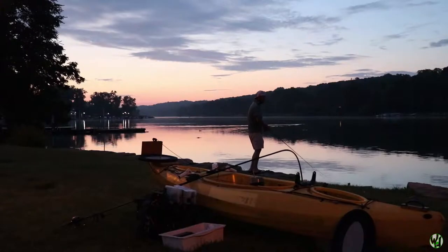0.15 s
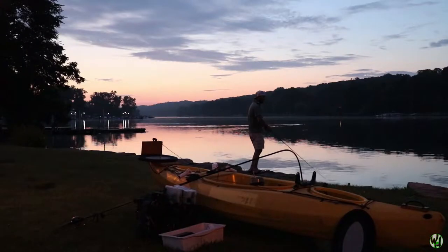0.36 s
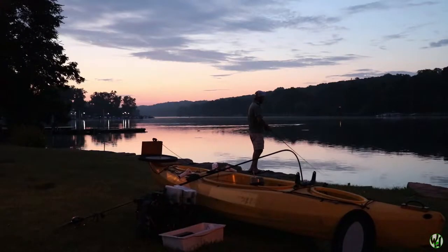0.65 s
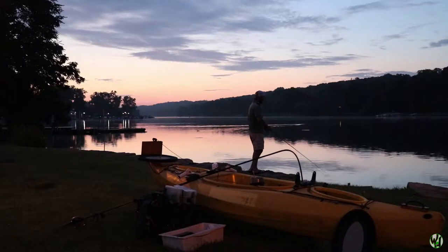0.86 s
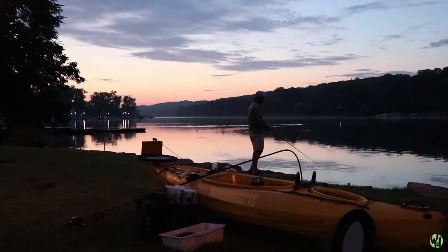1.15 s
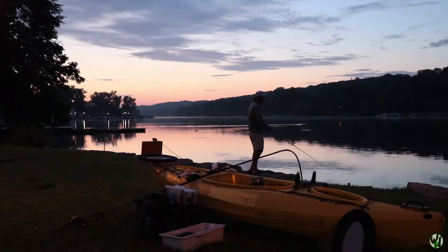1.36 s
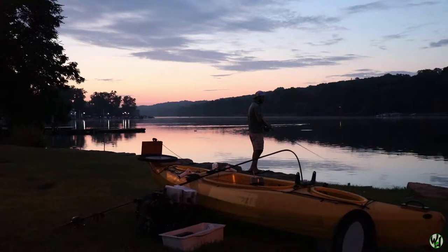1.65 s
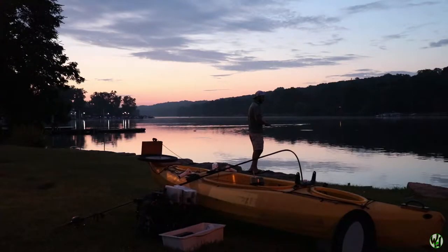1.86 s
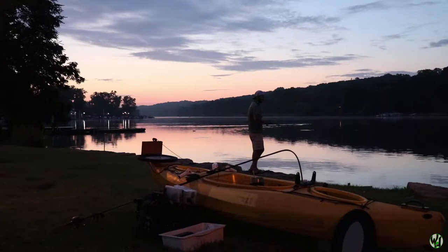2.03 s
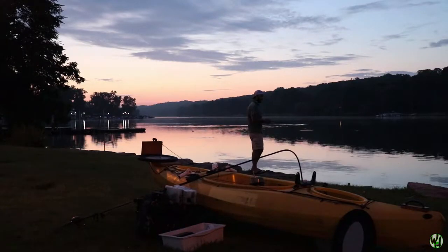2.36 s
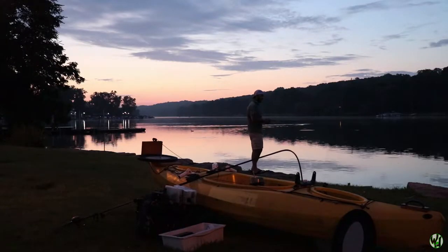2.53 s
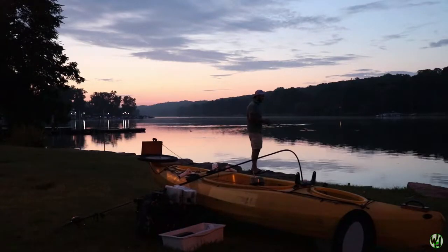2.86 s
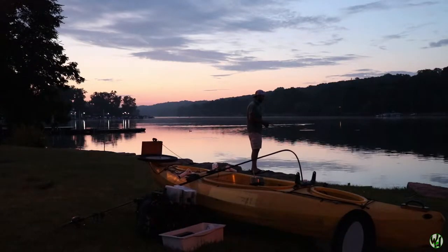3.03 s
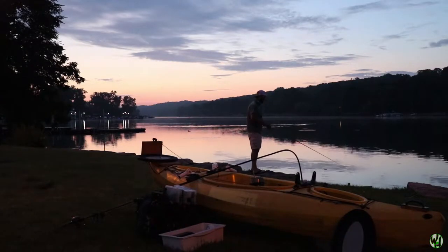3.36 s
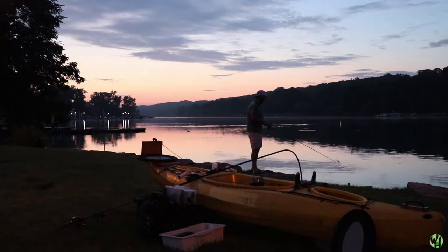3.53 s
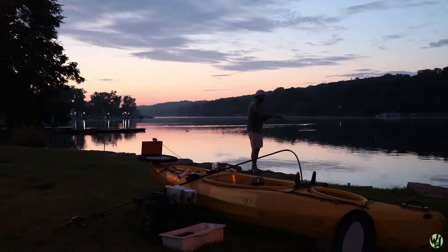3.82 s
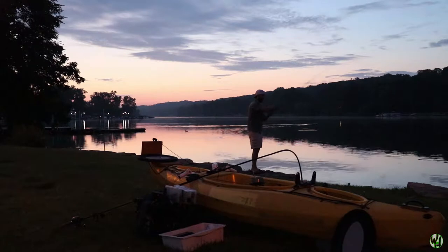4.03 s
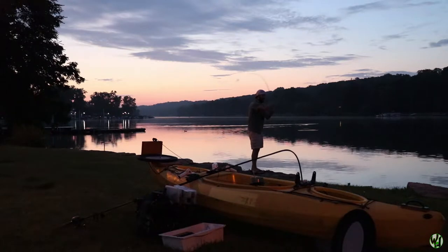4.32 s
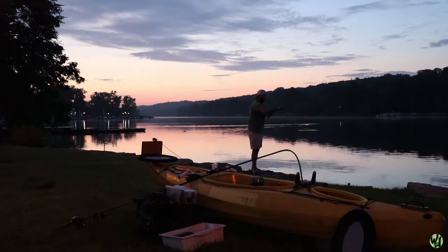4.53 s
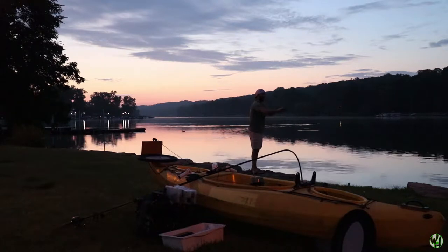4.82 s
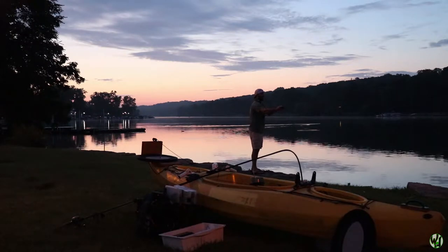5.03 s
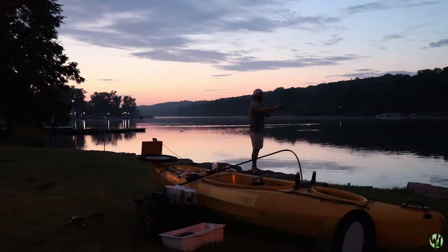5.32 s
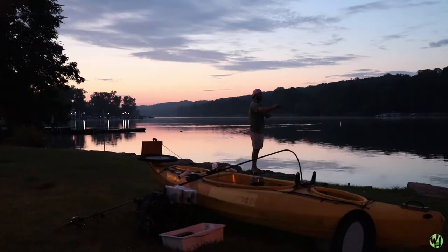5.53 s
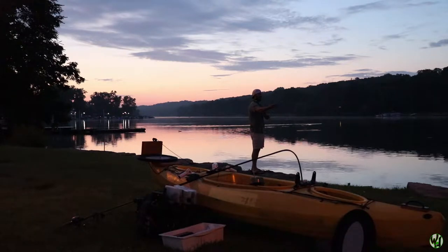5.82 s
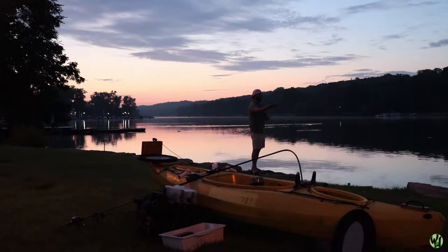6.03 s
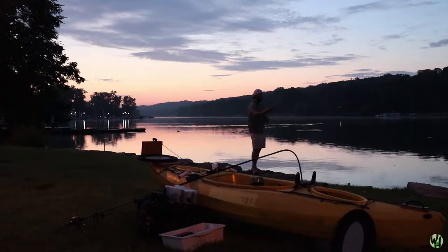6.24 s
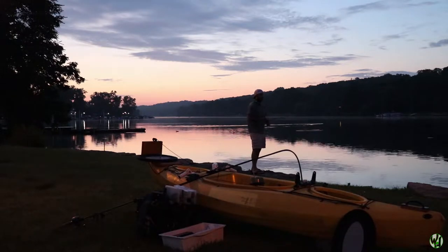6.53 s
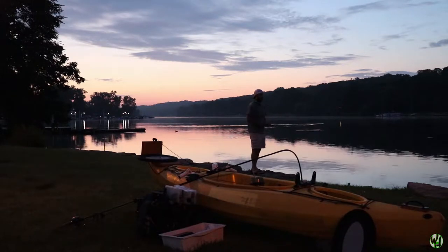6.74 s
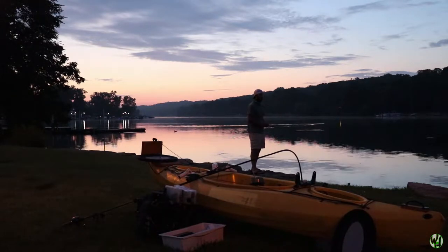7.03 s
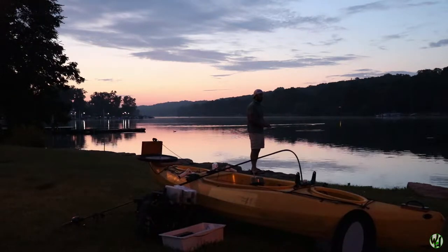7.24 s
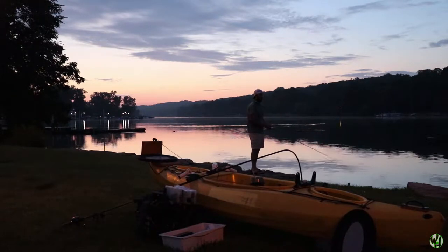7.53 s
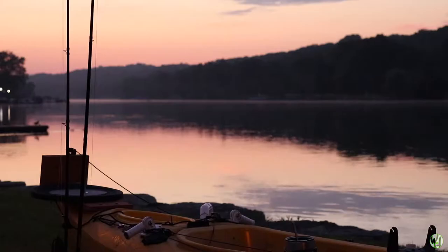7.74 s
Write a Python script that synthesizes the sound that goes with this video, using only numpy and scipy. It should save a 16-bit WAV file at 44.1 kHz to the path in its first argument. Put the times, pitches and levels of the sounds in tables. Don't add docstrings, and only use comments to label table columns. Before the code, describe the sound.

Lively birdsong echoes off lakeside trees while an angler's clothes rustle softly, the reel clicks, and a rod whips out a hissing line.

```python
import sys
import numpy as np
from scipy import signal
from scipy.io import wavfile
from scipy.ndimage import uniform_filter1d

SR = 44100
rng = np.random.default_rng(int(sys.argv[2]) if len(sys.argv) > 2 else 0)


def makeup_ratio(level_db):
    decades = np.asarray(level_db, float) / 20
    return 10 ** decades


def materialize(psi):
    bounded = np.clip(np.atleast_2d(psi).T, -1, 1)
    quanta = np.round(bounded * 32767).astype(np.int16)
    wavfile.write(sys.argv[1], SR, quanta)


N = 347508
TREES_T60_S = 0.52


def evened(x):
    return x / np.sqrt(np.mean(x ** 2) + 1e-20)


def read(points, hz):
    f, value = np.transpose(points)
    return np.interp(np.log(hz + 1), np.log(f + 1), value)


def curve(rows, column, off=None):
    rows = np.array(rows)
    return np.interp(np.arange(N) / SR, rows[:, 0], rows[:, column], off, off)


def add(mix, s, sound):
    part = mix[..., round(s * SR):][..., :sound.shape[-1]]
    part += sound[..., :part.shape[-1]]


def resonate(x, hz, width):
    turn = np.exp(2j * np.pi * np.cumsum(hz * np.ones(len(x))) / SR)
    r = np.exp(-np.pi * width / SR)
    smooth = signal.lfilter([(1 - r) ** 2], [1, -2 * r, r * r], x / turn + 1e-18)
    return 2 * (turn * smooth).real


def noise(colour, patchy_db, size=1024):
    frames, hz = 4 * N // size + 5, np.fft.rfftfreq(size, 1 / SR)
    a, b, patches = rng.standard_normal((frames, len(hz), 3)).T
    patches = uniform_filter1d(patches, size=12, axis=0)
    patches = evened(uniform_filter1d(patches, size=10, axis=1))
    z = (a + 1j * b) * makeup_ratio(read(colour, hz)[:, None] + patchy_db * patches)
    return evened(signal.istft(z, nperseg=size, noverlap=3 * size // 4)[1][:N])


def syrinx(hz, level_db, overtone_db, waver):
    steps = np.arange(len(hz)) * 250 / SR
    bend, throb = (np.interp(steps, np.arange(120), knots) for knots in rng.standard_normal((2, 120)))
    turn = 2 * np.pi * np.cumsum(hz * (1 + .015 * waver * bend)) / SR
    third = 0.23 * np.sin(3 * turn) * (3 * hz < SR / 2)
    tone = np.sin(turn) + makeup_ratio(overtone_db) * (np.sin(2 * turn) + third)
    return makeup_ratio(level_db + 2.5 * waver * throb) * tone * signal.windows.tukey(len(hz), .25)


def call(shape, overtone_db=-50, waver=1.1):
    s, hz, db = np.transpose(shape)
    t = np.arange(s[0], s[-1], 1 / SR)
    glide = uniform_filter1d(np.interp(t, s, hz), size=150)
    tone = syrinx(glide, np.interp(t, s, db), overtone_db, waver)
    return np.r_[np.zeros(round(s[0] * SR)), tone]


def slide(length, first_hz, middle_hz, last_hz, db, waver=.4):
    u = np.arange(0, 1, 1 / (length * SR))
    glide = first_hz * (1 - u) * (1 - 2 * u) + 4 * middle_hz * u * (1 - u) + last_hz * u * (2 * u - 1)
    return syrinx(glide, db - 2.5 * (2 * u - 1) ** 2, -57, waver)


def scatter(sound, branch_db, count=16):
    delay, sign = rng.random((count, 2)).T
    spread_s = .09 * min(makeup_ratio(branch_db), 1)
    taps = np.zeros(SR // 10)
    places = (spread_s * SR * delay ** 1.5).astype(int)
    taps[places] = np.sign(sign - .5) * makeup_ratio(branch_db - 8 * delay)
    taps[0] = 1
    return signal.fftconvolve(sound, taps / np.linalg.norm(taps))


def trees(x, t60):
    t, out = np.arange(0, 30000, 20), np.zeros(len(x))
    fade = makeup_ratio(-60 * t / SR / t60) * np.clip(t / SR / 0.021, 0, 1)
    for k in range(3):
        tail = np.zeros(t[-1] + 20)
        tail[t + rng.integers(0, 20, len(t))] = rng.laplace(size=len(t)) * fade
        share = np.sqrt(2 / 3) * np.cos(np.pi * (np.arange(len(x)) / SR * 0.889 + k / 3))
        out += signal.oaconvolve(x * share, tail / np.linalg.norm(tail))[:len(x)]
    return out


def sing(notes, calls, overtone_db, branch_db, echo_db):
    birds = np.zeros((2, N))
    for s, db in calls:
        for note in notes:
            voice = scatter(call(note, overtone_db), branch_db)
            add(birds, s, np.outer(makeup_ratio(db + np.array([0, echo_db])), voice))
    return birds


def gust():
    # pitch_hz, level_db
    gust_colour = [(12, -45), (20, -11), (86, -4.5), (172, -16), (217, -36), (416, -31), (586, -42),
                   (812, -36), (1500, -46.5), (1950, -45), (3300, -120)]
    hold_s, fall_db_per_s = 0.032, 64
    fall_db = fall_db_per_s * np.maximum(np.arange(N) / SR - hold_s, 0)
    return makeup_ratio(-23 - fall_db) * noise(gust_colour, patchy_db=0.5, size=2048)


def still_air():
    # pitch_hz, level_db
    air_colour = [(20, -45), (38, -14.5), (76, 2), (113, 1), (184, -3), (425, -18), (880, -21),
                  (1500, -26.5), (2300, -17), (3400, -9), (4400, -15.5), (5800, -29.5), (8000, -43),
                  (15800, -43)]
    return makeup_ratio(-41.5) * noise(air_colour, patchy_db=1.0, size=2048)


def far_road():
    # time_s, level_db
    road_level = [(0.0, -54.5), (1.42, -53.5), (2.04, -46.5), (2.85, -55), (5.1, -52), (5.5, -77),
                  (7.88, -71)]
    colour = [(500, -31.0), (900, -7.0), (1400, -5.5), (2100, 0.0), (3200, -26.5)]  # (Hz, dB)
    return makeup_ratio(curve(road_level, 1) - 3.5) * noise(colour, patchy_db=5.5)


def machinery():
    # pitch_hz, width_hz, level_db
    hums = [
        (360.3, 11, -69),
        (1033.3, 28, -66),
        (487, 47, -67.5),
        (2400, 44, -63),
    ]
    return sum(makeup_ratio(db) * evened(resonate(rng.standard_normal(N), hz, width)) for hz, width, db in hums)


def far_birds():
    # time_s, level_db
    chorus_level = [(0.0, -44.5), (.33, -41), (.68, -48.5), (.85, -38.5), (1.21, -48), (1.82, -46.5),
                    (2.6, -45), (2.98, -58), (3.1, -45), (3.27, -44), (4.25, -40), (4.56, -52.5),
                    (4.98, -40.5), (6.06, -68), (6.39, -43), (7.15, -52.5), (7.55, -44.5), (7.88, -57)]
    chirps_per_s = 42
    crowd = np.zeros(N + SR)
    draws = rng.random((int(chirps_per_s * len(crowd) / SR), 7))
    for when, length, low, high, arch, fall, db in draws:
        hz = 3000 + 650 * (low + high)
        first_hz, last_hz = hz + 500 * arch - 450, hz - 250 - 550 * fall
        chirp = slide(.018 + .035 * length, hz, first_hz, last_hz, -15 * db, waver=1.2)
        add(crowd, when * len(crowd) / SR, scatter(chirp, -4))
    return makeup_ratio(curve(chorus_level, 1)) * evened((1.4 * crowd + trees(crowd, .45))[SR:])


def flock_chirps():
    # start_s, length_s, first_hz, last_hz,
    # level_db
    hidden = [(0, 0.034, 3500, 2740, -38), (0.042, .04, 3280, 2600, -39.5),
              (0.098, 0.047, 3310, 2610, -40.5), (0.148, 0.046, 3000, 2714, -42.5),
              (3.375, 0.024, 3296, 3570, -30.5), (3.396, 0.044, 3574, 2900, -32),
              (5.072, .03, 3900, 3006, -32.5), (5.095, 0.036, 3600, 2880, -44),
              (5.741, 0.045, 3300, 3620, -34), (6.342, 0.024, 3904, 3280, -25.5),
              (6.386, .025, 4220, 3520, -35), (6.275, 0.042, 4990, 5040, -43.5),
              (7.581, 0.012, 3680, 3320, -33.5), (2.88, 0.04, 5650, 5770, -56),
              (0.19, 0.035, 4580, 4640, -51), (0.763, 0.028, 5250, 5150, -50), (1, 0.031, 3600, 2650, -41),
              (1.317, 0.04, 4000, 3600, -38.5), (1.673, 0.073, 3900, 2990, -39.5),
              (3.731, 0.035, 3396, 3034, -34.5), (3.8, 0.027, 3140, 3120, -45),
              (4.464, 0.044, 2894, 3970, -37), (6.236, 0.077, 3910, 2730, -41.5),
              (6.53, 0.046, 3900, 2940, -40), (6.7, 0.034, 3900, 5100, -49), (6.503, .05, 3710, 4060, -49),
              (6.726, 0.037, 3300, 3050, -40)]
    # start_s, length_s, first_hz,
    # last_hz, level_db
    faint = [(1.282, 0.074, 2930, 2920, -40), (1.354, 0.026, 4750, 4700, -50),
             (1.577, 0.025, 4800, 4760, -42), (1.75, 0.023, 3010, 3750, -34),
             (2.162, 0.078, 3460, 3224, -42.5), (2.23, 0.028, 3400, 4230, -43),
             (2.335, .05, 4570, 4400, -47), (2.804, 0.018, 5300, 5330, -56),
             (3.038, .035, 3300, 4740, -40.5), (3.064, 0.029, 2870, 3700, -36.5),
             (3.078, 0.032, 3490, 2920, -44), (3.11, 0.044, 3300, 2990, -43),
             (3.097, 0.039, 5100, 5010, -48), (3.167, 0.035, 3676, 4200, -42.5),
             (3.183, .04, 3030, 3190, -48), (3.21, 0.018, 5760, 5600, -56), (3.683, 0.034, 4200, 5100, -42),
             (3.776, 0.05, 2970, 3830, -47), (3.933, .03, 2920, 3740, -44),
             (3.954, 0.051, 2960, 2960, -40.5), (4.645, 0.0353, 3500, 2780, -42),
             (4.78, 0.025, 4000, 3950, -40), (5.465, 0.086, 4280, 4240, -52),
             (5.484, 0.055, 4620, 4600, -55), (6.02, 0.022, 3250, 3210, -43),
             (6.057, 0.037, 3100, 3110, -37), (6.185, 0.03, 3250, 3010, -38),
             (6.991, 0.015, 5640, 6830, -47.5), (7.001, 0.01, 6700, 6100, -48),
             (7.507, .035, 2870, 3690, -57), (7.636, 0.018, 2975, 3240, -35.5),
             (7.668, 0.024, 3196, 2890, -40), (7.752, 0.048, 5350, 4020, -55)]
    # start_s, length_s, top_hz, level_db
    hoops = [(2.236, 0.025, 3860, -46), (3.003, 0.031, 4900, -41.5), (3.16, 0.059, 3870, -39.5),
             (5.781, 0.045, 3980, -42)]
    ends = 0.4
    chirps = [(s, length, a, (a + b) / 2, b, db) for s, length, a, b, db in hidden + faint]
    chirps += [(s, length, ends * hz, hz, ends * hz, db) for s, length, hz, db in hoops]
    birds = np.zeros((2, N))
    for s, *tone in chirps:
        add(birds, s, np.outer(makeup_ratio(np.array([3, -2.5])), scatter(slide(*tone, waver=1.14), -6)))
    return birds


def rustle():
    # middle_s, half_length_s, level_db
    rustles = [(.0, 0.14, -55), (0.208, 0.064, -54.5), (0.772, 0.048, -51.5), (1.37, 0.042, -52),
               (1.5, 0.066, -55), (1.842, 0.055, -50), (1.963, .037, -58), (2.202, 0.1, -50),
               (2.36, 0.046, -48), (2.458, 0.064, -60), (3.106, 0.067, -55), (3.34, 0.092, -53.5),
               (3.717, 0.036, -51), (4.63, 0.06, -45), (4.817, 0.17, -52.5), (5.052, 0.055, -49.5),
               (5.691, 0.097, -55.5), (6.323, 0.09, -50), (6.9, 0.04, -55), (7.35, 0.055, -51),
               (7.557, .04, -57)]
    # pitch_hz, level_db
    rustle_colour = [(900, -21), (5000, 7), (6500, 0.5), (7300, -1.5), (8300, -11), (9800, -4.5),
                     (11000, -12.5), (12300, -9), (13300, -13), (15500, -22)]
    t = np.arange(N) / SR
    swell = sum(makeup_ratio(db) * np.exp(-((t - s) / half) ** 2) for s, half, db in rustles)
    return swell * noise(rustle_colour, patchy_db=3.5, size=256)


def chip_bird():
    # time_s, pitch_hz, level_db
    chip = [(.01, 5200, 10.5), (.018, 6830, -0.5), (.024, 7010, 5), (.03, 6850, 0.5), (.036, 6070, -1.5),
            (.04, 5500, 6)]
    # start_s, level_db
    chips = [(.048, -44), (0.782, -44.5), (1.505, -45), (2.494, -46), (3.443, -45), (4.783, -47),
             (5.54, -46.5), (6.193, -46), (6.854, -45.5), (7.817, -45)]
    # delay_s, level_db
    echoes = [
        (0.038, -1.5),
        (0.091, -9),
        (.115, -18),
        (0.136, -29),
        (0.208, -26),
    ]
    direct, send = birds = np.zeros((2, N))
    for s, db in chips:
        add(birds, s, np.outer(makeup_ratio(db + np.array([0, 2.5])), call(chip, waver=0.41)))
        for (delay_s, bank_db), luck in zip(echoes, rng.standard_normal(len(echoes))):
            echo = scatter(call(chip, waver=0.67), -3.0)
            add(direct, s + delay_s, makeup_ratio(db + bank_db + 3.9 * luck) * echo)
    return birds


def far_arch_bird():
    # time_s, pitch_hz, level_db
    high = [(.012, 4403, 7), (.022, 5200, -2), (.04, 4900, 3.5), (.05, 3600, 10), (.062, 3180, -3)]
    # time_s, pitch_hz, level_db
    low = [(.062, 3100, 4), (.08, 3420, 4), (.1, 3900, 3), (.11, 3800, 2), (.128, 2950, 3.1)]
    # start_s, level_db
    calls = [(.179, -40), (.745, -38), (1.325, -43), (2.14, -47.5), (3.07, -41), (3.869, -42),
             (5.014, -38.5), (5.98, -42), (6.859, -39), (7.512, -38.5)]
    return sing((high, low), calls, -48, -2, -11)


def reel_and_drips():
    # start_s, peak_db, ring_hz, brightness_db
    clicks = [(0.199, -33.5, 925, -32), (0.77, -48, 950, -40), (1.38, -41.5, 907, -26),
              (1.499, -36.5, 1012, -33), (1.8, -37, 1320, -33), (3.7003, -17, 3770, -11),
              (3.7024, -32, 2000, -15), (3.7045, -27, 4500, -21), (3.866, -40, 7010, -7),
              (6.21, -44, 1540, 10.5), (6.689, -48, 8800, -8), (6.741, -58, 8000, -8),
              (2.766, -56, 8000, -8), (2.955, -58, 8500, -4), (7.3118, -36, 8300, -8),
              (7.3155, -17, 3300, -10), (7.318, -17.5, 2460, -19), (7.3188, -13.5, 2850, -14.5),
              (7.3194, -32, 783, -30), (7.3218, -22, 3000, -8), (7.324, -27, 1160, -20),
              (7.3297, -15.5, 3260, -15)]
    out, t = np.zeros(N), np.arange(700) / SR
    for (s, db, hz, bright_db), snap in zip(clicks, rng.standard_normal((len(clicks), 700))):
        ring_s = 0.00036 + 3600 / hz ** 2
        ring = np.sin(2 * np.pi * hz * t) * np.exp(-t / ring_s) * (1 - np.exp(-t / 0.000067))
        add(out, s, makeup_ratio(db) * (ring + makeup_ratio(bright_db) * snap * np.exp(-t / 0.00089)))
    return signal.sosfilt(signal.butter(3, 514, "high", fs=SR, output="sos"), out)


def whistles():
    # start_s, length_s, middle_hz, level_db
    drops = [(0.211, 0.026, 1930, -55), (.518, 0.036, 1740, -57), (0.85, 0.042, 1830, -61),
             (3.481, 0.17, 1730, -65), (3.879, .036, 1820, -49), (4.037, 0.033, 1847, -49),
             (4.188, 0.042, 1830, -48.5), (4.898, 0.063, 1897, -52), (6.531, 0.051, 1800, -72),
             (6.822, 0.085, 1740, -62), (7.136, 0.059, 1710, -61), (7.433, 0.033, 1840, -57),
             (7.72, 0.083, 1790, -60)]
    # start_s, length_s, first_hz, last_hz, level_db
    slurs = [
        (0.522, 0.36, 2800, 1900, -53),
        (2.052, 0.22, 1754, 2080, -54.5),
        (2.249, 0.35, 2170, 3090, -45),
        (2.739, 0.12, 2400, 1560, -58),
        (3.133, 0.19, 1670, 2035, -48.5),
        (3.409, 0.26, 2227, 3050, -41),
        (5.252, 0.17, 2830, 1350, -63),
        (5.485, .105, 2560, 2490, -57.5),
    ]
    # start_s, length_s, pitch_hz, level_db
    held = [(0.202, 0.1, 2433, -38.5), (0.315, 0.1, 2620, -42), (.736, 0.15, 2186, -54),
            (2.64, 0.062, 2045, -53.5), (2.96, 0.11, 2760, -50.5), (3.22, 0.098, 1690, -52),
            (3.28, 0.11, 2170, -53), (4.25, 0.08, 2390, -53), (5.829, 0.13, 2400, -58.5),
            (6.51, 0.16, 2438, -57), (6.723, 0.028, 2440, -55), (6.876, 0.084, 2320, -56)]
    sag = 1.6
    tones = [(s, length, 1.2 * hz, hz, .905 * hz, db) for s, length, hz, db in drops]
    for s, length, a, b, db in slurs:
        mean_hz = (a * b) ** .5
        tones.append((s, length, a, mean_hz - sag * ((a + b) / 2 - mean_hz), b, db))
    tones += [(s, length, hz, hz, hz, db) for s, length, hz, db in held]
    birds = np.zeros((2, N))
    for s, *tone in tones:
        add(birds, s, np.outer(makeup_ratio(np.array([4.5, -2.5])), slide(*tone)))
    return birds


def short_bird():
    # time_s, pitch_hz, level_db
    fall = [(.008, 3460, -18), (.022, 4750, -15.5), (.03, 4423, -17), (.036, 4234, -2.5), (.043, 4150, -6),
            (.049, 3490, -10), (.058, 3270, -3.5)]
    # time_s, pitch_hz, level_db
    peak = [(.082, 2758, -12.5), (.096, 3210, -15.5), (.104, 3543, 1.5), (.109, 3780, -17),
            (.112, 4005, -3.5), (.116, 3470, -4), (.124, 2841, -15)]
    # time_s, pitch_hz, level_db
    hurried = [(.012, 3900, 7), (.022, 4970, -11), (.032, 4900, -8.5), (.041, 4250, -6), (.05, 3950, 1),
               (.058, 3580, -12)]
    # start_s, level_db
    calls = [(.349, -18.5), (2.621, -18.5), (4.865, -18.5), (7.19, -21)]
    # start_s, level_db
    hurried_fall = [(3.358, -25)]
    # start_s, level_db
    hurried_peak = [(3.341, -20.5)]
    full = sing((fall, peak), calls, -48, -11, -14)
    quick = sing((hurried,), hurried_fall, -48, -11, -14)
    return full + quick + sing((peak,), hurried_peak, -48, -18, -14)


def across():
    # start_s, length_s, first_hz, last_hz, level_db
    calls = [(0.457, 0.2, 2470, 2330, -53), (1.07, 0.054, 2000, 1805, -54), (1.275, 0.047, 1900, 1800, -50),
             (1.962, 0.069, 2750, 2180, -47), (2.408, 0.065, 1950, 1730, -51.5),
             (3.8, 0.11, 2100, 1790, -53), (4.695, 0.041, 2000, 1870, -56), (4.772, 0.055, 2350, 2130, -47),
             (7.548, 0.055, 2800, 2210, -63), (7.62, .04, 2300, 2200, -53), (1.498, 0.061, 2500, 2440, -48),
             (4.0, 0.055, 2100, 1910, -54)]
    out = np.zeros(N)
    for s, length, first_hz, last_hz, db in calls:
        tone = slide(length, first_hz, (first_hz * last_hz) ** .5, last_hz, db)
        add(out, s, scatter(tone, -6.5))
    return out


def buzz_bird():
    # time_s, pitch_hz, level_db
    buzz = [(0, 6400, -8), (.012, 5900, 0), (.028, 6150, -2), (.04, 6900, -8)]
    # start_s, level_db
    calls = [(.595, -52), (1.44, -58), (2.14, -58), (3.075, -52), (3.262, -49), (4.285, -57), (5.238, -47),
             (6.835, -53), (7.475, -51)]
    return sing((buzz,), calls, -50, -3, -7)


def warbler():
    # time_s, pitch_hz, level_db
    held = [(.012, 3397, -6), (.024, 3953, -11), (.03, 4193, -3), (.058, 4223, -4.5), (.069, 3400, -0.5),
            (.082, 2950, -3.5)]
    # time_s, pitch_hz, level_db
    arch = [(.084, 3154, -5), (.108, 3700, -3), (0.124, 4133, -2.5), (.132, 3960, -5), (.14, 3300, -5),
            (0.151, 2510, 8)]
    # time_s, pitch_hz, level_db
    under = [(.094, 3173, 2), (.11, 3580, -4), (0.124, 3716, -8.5), (.134, 3620, -22), (.144, 2920, 1)]
    # time_s, pitch_hz, level_db
    upper = [(.02, 4220, 2), (0.031, 4810, -10), (.058, 4737, -7.5), (.072, 3440, -34)]
    # start_s, level_db
    calls = [(0.629, -28.5), (1.463, -28.5), (2.387, -26.5), (4.301, -30.5), (5.254, -28), (6.288, -28.5),
             (7.336, -28)]
    # start_s, level_db
    varied = [(3.281, -28)]
    full = sing((held, arch, under), calls, -26, -8, -9)
    full += sing((upper,), calls, -28, -10, -8)
    return full + sing((held, upper), varied, -26, -10, -9)


def tick_bird():
    # time_s, pitch_hz, level_db
    tick = [(.01, 5310, 35), (.016, 5810, 26.4), (.024, 5600, 19), (.03, 5030, 4.3)]
    # start_s, level_db
    calls = [(0.994, -66.5), (1.807, -65.5), (2.333, -65.5), (2.467, -69), (3.126, -70), (3.994, -69),
             (4.08, -73), (4.99, -63.5), (6.091, -68)]
    return sing((tick,), calls, -50, -9, -4)


def arch_bird():
    # time_s, pitch_hz, level_db
    high = [(.01, 3543, -20), (.018, 4137, 1.5), (.026, 5077, -6), (.049, 4900, -1.5), (.055, 4150, 4),
            (.067, 3494, 4.5), (.077, 3160, 5)]
    # time_s, pitch_hz, level_db
    low = [(.078, 3328, 7), (.087, 3965, -2), (.095, 4156, 8.5), (.106, 4170, -1.5), (.113, 3400, 6),
           (.122, 2800, -2.5), (.132, 2430, -4.5)]
    # start_s, level_db
    calls = [(1.076, -28.5), (1.846, -28.5), (4.088, -28), (5.608, -27.5), (6.337, -30)]
    return sing((high, low), calls, -42, -10, -11)


def slip_bird():
    # time_s, pitch_hz, level_db
    slip = [(0, 6430, -23), (.008, 6200, -11), (.018, 5270, 1)]
    # start_s, note_count
    runs = [(1.08, 3), (5.42, 2), (5.832, 4)]
    gap_s, level_db = .105, -51
    calls = [(s + k * gap_s, level_db) for s, count in runs for k in range(count)]
    return sing((slip,), calls, -50, -14, -7.5)


def near_birds():
    voices = [flock_chirps(), chip_bird(), far_arch_bird(), whistles(), short_bird(), buzz_bird(),
              warbler(), tick_bird(), arch_bird(), slip_bird()]
    direct, send = sum(voices)
    return direct + trees(send, TREES_T60_S)


def sighs_and_coos():
    # start_s, length_s, first_hz, last_hz, level_db
    sighs = [
        (4.41, .11, 2180, 1690, -52),
        (4.98, .14, 2170, 1670, -52),
        (5.415, .15, 2210, 1670, -48),
        (5.54, .42, 2300, 1560, -56),
    ]
    # start_s, length_s, pitch_hz, level_db
    coos = [(1.62, .14, 500, -60), (4.56, .2, 532, -57), (5.39, .17, 482, -58), (6.62, .18, 482, -60),
            (7.6, .25, 478, -59)]
    out = np.zeros(N)
    for s, length, first_hz, last_hz, db in sighs + [(s, length, hz, hz, db) for s, length, hz, db in coos]:
        u = np.arange(0, 1, 1 / (length * SR))
        ease = np.cos(np.pi * np.minimum(1.15 * u, 1) / 2) ** 2
        add(out, s, syrinx(last_hz + (first_hz - last_hz) * ease, db - 3 * u, -57, .3))
    return out + makeup_ratio(-29.0) * trees(out, TREES_T60_S)


def sliding_hiss(path, width):
    hiss = evened(resonate(rng.standard_normal(N), curve(path, 1), width))
    return makeup_ratio(curve(path, 2, -140)) * hiss


def line_drawn():
    # time_s, hiss_hz, level_db
    draw = [
        (2.2, 7200, -75),
        (2.27, 7600, -56),
        (2.33, 9400, -57),
        (2.365, 12200, -57),
        (2.4, 13000, -68),
        (2.47, 13500, -60),
        (2.52, 13340, -75),
    ]
    return sliding_hiss(draw, 1800)


def rod_whip():
    # time_s, swish_hz, swish_db, rush_db
    whip = [
        (4.5, 1807, -81, -47),
        (4.52, 2620, -25.5, -50),
        (4.535, 5900, -30, -36),
        (4.555, 9900, -31.5, -39.5),
        (4.572, 13000, -43.5, -37.5),
        (4.6, 13100, -55, -50),
        (4.7, 13500, -85, -56),
    ]
    colour = [(200, -13), (500, -2.0), (1700, -0.5), (6000, -13.5), (15000, -15)]  # (Hz, dB)
    rush = makeup_ratio(curve(whip, 3, -140)) * noise(colour, patchy_db=-1.5, size=256)
    return sliding_hiss(whip, 1170) + rush


def line_out():
    # time_s, hiss_hz, level_db
    running = [
        (4.64, 12900, -71),
        (4.68, 12900, -48),
        (4.75, 12000, -54),
        (4.82, 10200, -53),
        (4.9, 8820, -58),
        (4.96, 8000, -61),
        (5.02, 7500, -76),
    ]
    return sliding_hiss(running, 2200)


def scene():
    background = gust() + still_air() + far_road() + machinery()
    birds = far_birds() + near_birds() + across() + sighs_and_coos()
    angler = rustle() + reel_and_drips() + line_drawn() + rod_whip() + line_out()
    mid = background + birds + angler
    return np.array([mid, mid])


def band_limit(x):
    return signal.sosfilt(signal.butter(12, 15940, fs=SR, output="sos"), x)


def record(dry):
    # pitch_hz, level_db
    side_colour = [(60, -18), (300, -19), (1500, -27), (5000, -32), (9000, -24), (15000, -22)]
    side = makeup_ratio(-71.0) * noise(side_colour, patchy_db=3.0)
    bass_cut = signal.butter(4, 36, "high", fs=SR, output="sos")
    wide = signal.sosfilt(bass_cut, dry + np.outer([1, -1], side))
    edge = signal.firwin(511, 15780, window=("kaiser", 10), fs=SR)
    return band_limit(signal.oaconvolve(wide, edge[None], "same"))


dry = scene()
out = record(dry)
materialize(out)
```